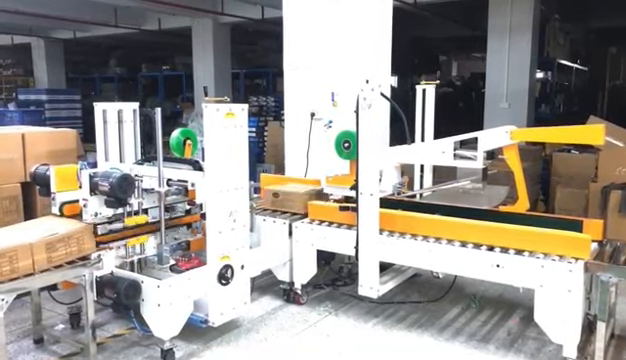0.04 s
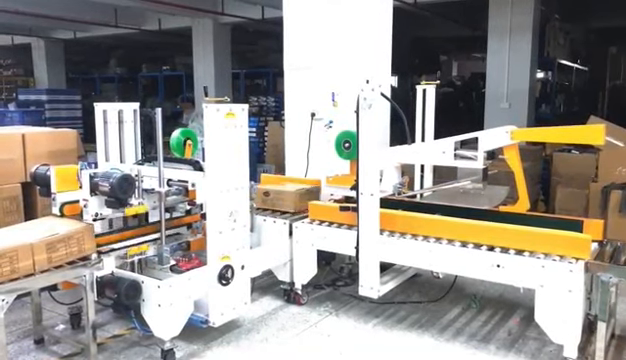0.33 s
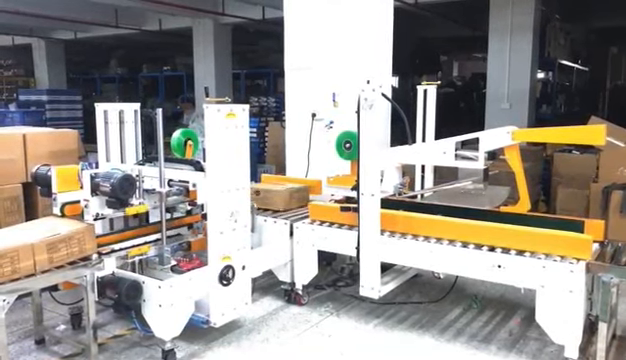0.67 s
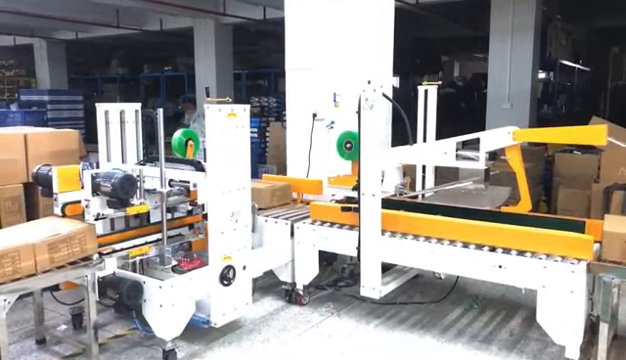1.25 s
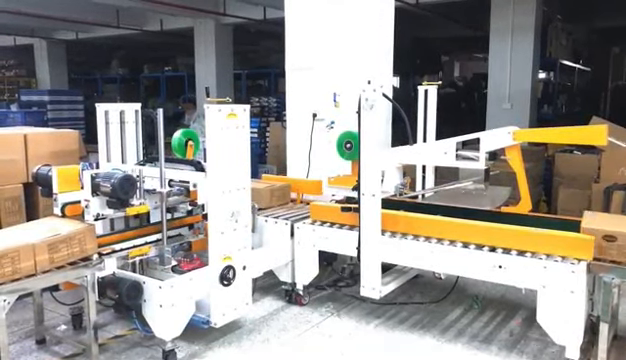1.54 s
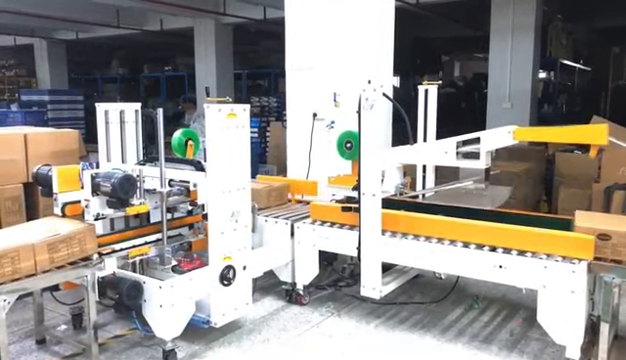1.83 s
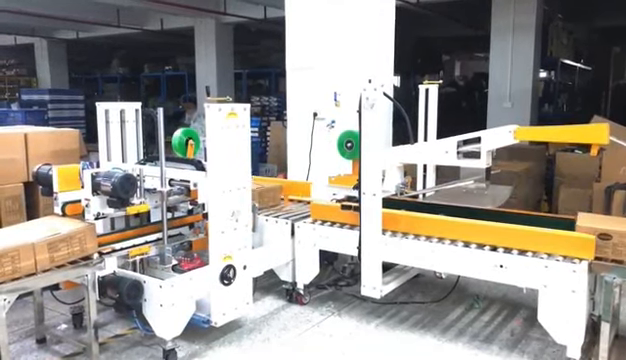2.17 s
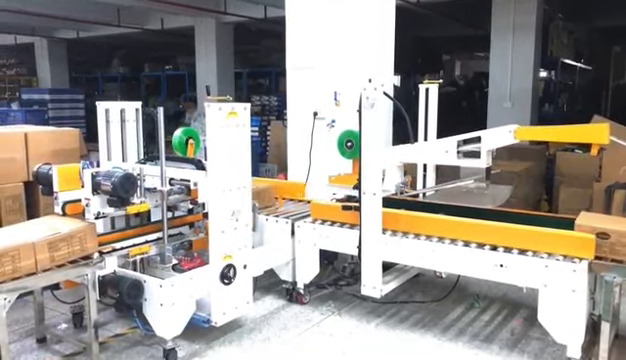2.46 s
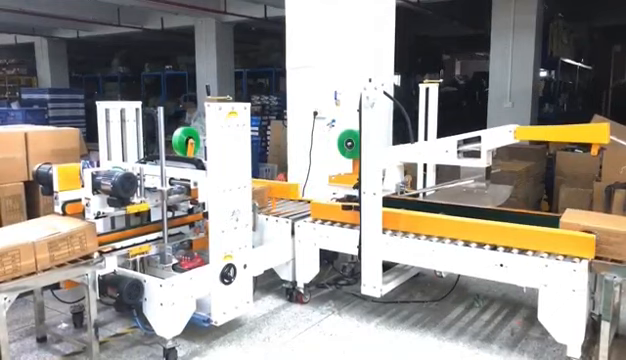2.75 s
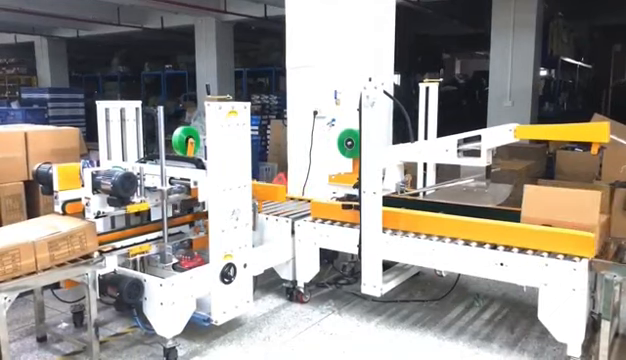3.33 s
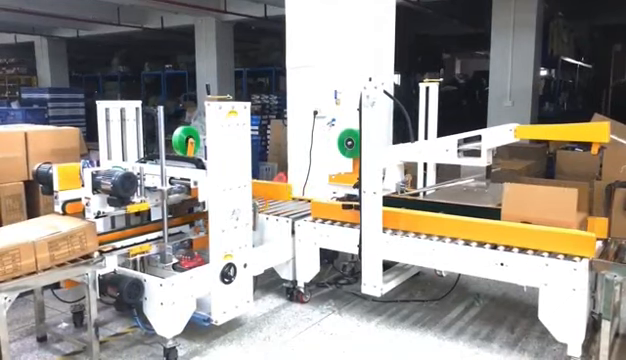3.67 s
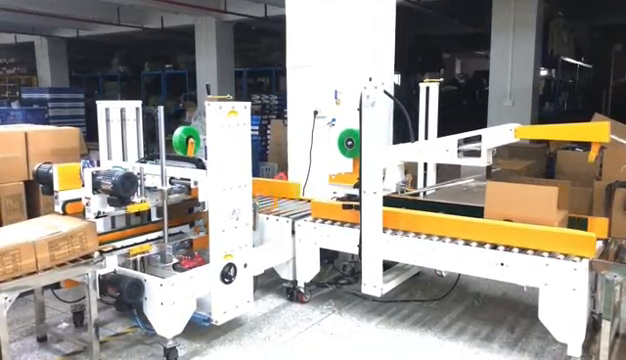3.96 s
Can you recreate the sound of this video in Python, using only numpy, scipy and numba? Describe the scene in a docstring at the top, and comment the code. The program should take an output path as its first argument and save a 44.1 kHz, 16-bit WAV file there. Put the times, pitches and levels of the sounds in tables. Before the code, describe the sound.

Packing tape squawks in a carton sealing machine at about 0.3 and 1.1 seconds, each time with a puff of air; the second leaves a slowly fading hiss. Cardboard scrapes around 1.5 seconds, and a metal arm rattles and clanks at 1.8. From 3 to 4 seconds tape peels in a long rasp with brief squeals. Throughout, cartons bump along a softly rumbling conveyor in an echoing warehouse.

```python
"""A carton sealing line in a warehouse; cartons bump along a rumbling conveyor throughout.
Air cylinders vent and linkages clack. At 0.3 s and 1.1 s packing tape squawks off its roll as stick-slip
rings the film; a slow air bleed starts with the second pull. A folding arm scrapes a flap, swings up and
strikes its stop at 1.8 s. From 3 s a long pull rasps through a carton, which squeals where it catches."""
import sys
import numpy as np
from scipy import signal
from scipy.fft import rfft, irfft
from scipy.io import wavfile
from scipy.ndimage import uniform_filter1d
from numba import njit

SR = 44100
rng = np.random.default_rng(int(sys.argv[2]) if len(sys.argv) > 2 else 0)


def wav_record(signal):
    """Record a signal, one row per channel, as 16-bit PCM in the file named by sys.argv[1]."""
    frames = np.transpose(np.atleast_2d(signal))
    bounded = np.clip(frames, -1, 1)
    # unit amplitude maps onto the largest positive 16-bit level
    quanta = np.round(bounded * 32767).astype(np.int16)
    wavfile.write(sys.argv[1], SR, quanta)


N = 176400

SLIP_JITTER, SLIP_SCATTER_DB = 0.4, 2  # stick-slip of the tape
# cardboard friction spectrum (frequency [Hz], relative density [dB])
CARDBOARD = [(80, -14), (260, -7), (480, -4), (760, -0.5), (1080, -4.5), (2300, -3.5), (3400, -7),
             (13000, -24)]


def short_pulls(t):
    """Stick-slip jerks ring the stretched film, finer snaps crackle, and the spinning roll drones."""
    # one table per pull (time [s], film ring [Hz], relative ring level [dB], relative crackle level [dB])
    pulls = [
        [(0.281, 2060, -20.5, -28), (0.348, 2270, -7.5, -23.5), (0.362, 2520, -18, -24),
         (0.386, 2630, -16, -22), (0.431, 2230, -21, -21), (0.48, 2280, -10, -21.5), (0.518, 2300, -19, -23.5),
         (0.538, 2240, -9.5, -27.5), (0.578, 2290, -23, -30), (0.6, 2210, -16, -38), (0.625, 2210, -42, -44)],
        [(1.14, 2480, -29, -16), (1.16, 2400, -10.5, -26), (1.21, 2260, -6.5, -19.5), (1.282, 2260, -7, -20),
         (1.474, 2620, -18.5, -16.5), (1.538, 2110, -14.5, -19), (1.59, 2440, -40, -36)],
    ]
    # glue crackle spectrum (frequency [Hz], relative density [dB])
    crackle_spectrum = [(100, -7.5), (700, -5), (1700, -0.5), (2800, 4.5), (4200, 1.5), (7500, -5.5),
                        (11800, -9), (14000, -19)]
    # roll drones (start [s], length [s], level [dB], pitch [Hz], glide [Hz/s])
    drones = [(0.276, 0.08, -36.5, 175, -2), (0.382, .18, -28.5, 198.2, 85),
              (1.127, 0.092, -30.5, 195.2, 163)]
    ring_gain_db, ring_width_hz, crackle_gain_db = -10.5, 550, 1
    whistle_db, whistle_width_hz = -7.5, 100  # narrow core, level relative to the ring
    out = 0
    for pull in pulls:
        times, hz, ring_db, crackle_db = np.array(pull, float).T
        gate = envelope(t, times[0], times[-1] - times[0], attack_s=0.0065, release_s=0.022)
        slips = snaps(420, SLIP_JITTER, SLIP_SCATTER_DB)
        fine = unit(snaps(rate_hz=3200, jitter=1.0, scatter_db=2) + 0.5 * slips)
        centre_hz = np.interp(t, times, hz) * (1 + 0.036 * walk(60.55))
        ring = unit(resonate_twice(slips + 0.69 * fine, centre_hz, ring_width_hz))
        ring += undb(whistle_db) * unit(resonate_twice(noise(), centre_hz, whistle_width_hz))
        ring *= undb(ring_gain_db + np.interp(t, times, ring_db))
        crackle = colour(fine, crackle_spectrum) * undb(crackle_gain_db + np.interp(t, times, crackle_db))
        out += gate * (ring + crackle)
    return out + groans(t, drones, waver=0.059, attack_s=0.017, release_s=0.017)


def long_pull(t):
    """Tape peels at belt speed; its dense snaps sound through the carton, which squeals as it catches."""
    # peel spectrum (frequency [Hz], relative density [dB])
    peel_spectrum = [(60, -33), (130, -11), (520, -10.5), (900, -4), (1170, -5), (2200, -1.5), (3350, -4),
                     (4450, -5), (7300, -9.5), (11500, -10.5), (13900, -25)]
    # taped carton resonances (frequency [Hz], width [Hz], gain on the peel [dB])
    carton_modes = [(736, 93, -2), (878, 28, 1.5), (1580, 94, -6.5), (2190, 110, -8), (2900, 160, -7)]
    # tape grabs and rasps harder (start [s], length [s], level [dB], film ring [Hz])
    surges = [(3.628, 0.066, -22.5, 2430), (3.836, 0.049, -21, 2500)]
    # carton squeals (start [s], length [s], level [dB], pitch [Hz], glide [Hz/s])
    squeals = [(3.624, 0.068, -24.5, 893, -700), (3.73, .04, -30, 970, 300), (3.968, .05, -16.5, 702, 1500)]
    start_s, attack_s, rasp_db = 2.978, 0.05, -15.5
    glue = snaps(rate_hz=4200, jitter=0.96, scatter_db=0.5)
    peel = colour(glue * undb(1.35 * walk(70) + 0.5 * walk(12)), peel_spectrum)
    carton = 0
    for hz, width_hz, db in carton_modes:
        gain = undb(db + 4.8 * walk(7.6))
        centre_hz = hz * (1 + 0.044 * walk(9))  # shifts as the carton moves
        carton += gain * resonate(peel, centre_hz, width_hz)
    rasp = unit(peel + carton) * undb(rasp_db) * np.clip((t - start_s) / attack_s, 0, 1) ** 2
    for grab_s, length_s, db, hz in surges:
        jerks = unit(resonate_twice(snaps(260, SLIP_JITTER, SLIP_SCATTER_DB), hz, width_hz=1150))
        rasp += undb(db) * jerks * envelope(t, grab_s, length_s, attack_s=0.008, release_s=0.01)
    return rasp + groans(t, squeals, waver=0.049, attack_s=0.012, release_s=0.01)


def groans(t, rows, waver, attack_s, release_s):
    """Short friction tones that glide and waver in pitch and strength."""
    flicker_db = 3
    out = 0
    for start_s, length_s, db, hz, glide_hz_per_s in rows:
        pitch_hz = (hz + glide_hz_per_s * np.clip(t - start_s, 0, length_s)) * (1 + waver * walk(150))
        shape = envelope(t, start_s, length_s, attack_s, release_s)
        tone = shape * np.sin(2 * np.pi * np.cumsum(pitch_hz) / SR) * undb(flicker_db * walk(110))
        out += undb(db) * tone * np.sqrt(np.sum(shape ** 2) / (np.sum(tone ** 2) + 1e-18))
    return out


def air_vents(t):
    """Each cylinder valve opens at once and hisses more weakly as the pressure falls."""
    # air bursts (start [s], length [s], level [dB], fall [dB/s], attack [s])
    vents = [(-.05, 0.12, -24, 19, .01), (0.27, 0.065, -30, 18, .008), (0.759, 0.045, -40.5, 4, .025),
             (1.093, .01, -30, 0, 0.0045), (1.104, 0.015, -17.5, 300, 0.0028),
             (1.817, 0.02, -21.5, 56, .01), (2.872, 0.03, -29.5, 20, .012)]
    # hiss spectrum (frequency [Hz], relative density [dB])
    spectrum = [(300, -1), (1400, -7.5), (2600, -1), (5800, 2.5), (8200, 0.5), (11600, 1.5), (13800, -17)]
    power = 0
    for start_s, length_s, db, fall_db_per_s, attack_s in vents:
        gain = undb(db - fall_db_per_s * np.clip(t - start_s, 0, length_s))
        power += (gain * envelope(t, start_s, length_s, attack_s, release_s=0.023)) ** 2
    return colour(noise(), spectrum) * np.sqrt(power)


def air_bleed(t):
    """One cylinder empties slowly through a throttle."""
    # throttle hiss spectrum (frequency [Hz], relative density [dB])
    spectrum = [(1200, -9.5), (2100, -0.5), (2800, 0.5), (3400, -4), (6300, 1.5), (8300, -5), (11600, -2.5),
                (13400, -26)]
    start_s, attack_s, level_db, fall_db_per_s = 1.09, 0.054, -27, 4
    gain = undb(level_db - fall_db_per_s * (t - start_s)) * np.clip((t - start_s) / attack_s, 0, 1)
    return colour(noise(), spectrum) * gain


def flap_rub(t):
    """Cardboard drags along the guides and under the folding arm in fine, uneven catches."""
    # rubbing strength (time [s], level [dB])
    levels = [(0.33, -51), (0.46, -33), (0.68, -62), (0.80, -38), (1.05, -56), (1.29, -31), (1.39, -47),
              (1.50, -20.5), (1.58, -44), (1.72, -38), (1.82, -23.5), (1.93, -30.5), (2.22, -32.5),
              (2.29, -42.5), (2.5, -39.5), (2.58, -36), (2.75, -42.5), (3.05, -35.5)]
    times, db = np.array(levels).T
    rub = colour(snaps(rate_hz=2500, jitter=0.99, scatter_db=1.0), CARDBOARD)
    gate = envelope(t, times[0], times[-1] - times[0], attack_s=0.0082, release_s=0.043)
    return rub * undb(np.interp(t, times, db) + 1.7 * walk(39.6)) * gate


def folding_arm(t):
    """The arm rattles harder as it swings up, then strikes its stop; both ring its steel frame."""
    # blows on the stop (time [s], drive level [dB])
    stops = [(1.811, -29), (1.832, -23)]
    # frame resonances (frequency [Hz], gain [dB])
    modes = [(732, 1), (1150, -2), (1440, 0), (2270, -8), (2720, -9)]
    swing_drive_db, width_hz = -29.5, 87
    swing = undb(swing_drive_db) * envelope(t, 1.73, length_s=0.07, attack_s=0.07, release_s=0.051)
    blows = sum(undb(db) * envelope(t, at_s, 0, attack_s=0.001, release_s=0.011) for at_s, db in stops)
    drive = swing * snaps(rate_hz=900, jitter=0.8, scatter_db=0) + blows * noise()
    ring = sum(undb(db) * resonate_twice(drive, hz, width_hz) for hz, db in modes)
    return ring * np.sqrt(SR / (np.pi * width_hz))  # make-up gain for the narrow bands


def carton_bumps(t):
    """Cartons bump on the rollers: hollow modes with a little cardboard grit."""
    # bumps (time [s], level [dB], pitch [Hz])
    bumps = [(0.116, -34.5, 327), (0.776, -25, 156.7), (0.984, -30.5, 156), (1.022, -29, 97),
             (1.133, -30, 161), (1.471, -28, 292), (1.622, -25.5, 157), (1.827, -28.5, 134),
             (2.552, -21.5, 160), (2.61, -30, 150), (3.265, -23.5, 197), (3.357, -17.5, 268),
             (3.415, -22, 202), (3.974, -23, 296)]
    # carton modes (frequency [x pitch], gain [dB])
    modes = [(.68, -9), (1.002, 1.5), (1.32, -6.5), (2.1, -10.5)]
    grit = undb(-25) * colour(noise(), CARDBOARD)
    out = 0
    for at_s, level_db, hz in bumps:
        body = sum(undb(db) * np.sin(2 * np.pi * hz * ratio * (t - at_s)) for ratio, db in modes)
        shape = envelope(t, at_s, length_s=0.0055, attack_s=0.0055, release_s=0.022)
        out += undb(level_db) * shape * (body + grit)
    return out


def linkage_clacks(t):
    """Metal linkages knock in short, bright bursts."""
    # clacks (time [s], level [dB])
    clacks = [(.117, -30), (0.213, -30.5), (1.871, -23.5), (2.109, -29)]
    # linkage spectrum (frequency [Hz], relative density [dB])
    spectrum = [(200, -16), (1900, 3.5), (2300, 12), (2800, -0.5), (6000, 1), (13000, -16)]
    blows = sum(undb(db) * envelope(t, at_s, 0, attack_s=0.00083, release_s=0.048) for at_s, db in clacks)
    return colour(noise() * blows, spectrum)


def conveyor(t):
    """Rollers rumble more under load and waver, over the steady whirr of the motors."""
    # roller spectrum (frequency [Hz], relative density [dB])
    roller_spectrum = [(20, -19.5), (55, -4.5), (200, -5.5), (2000, -58)]
    # rumble strength (time [s], level [dB])
    levels = [(1.07, -44.5), (1.12, -37.5), (2.2, -43.5), (3.4, -39)]
    # motor spectrum (frequency [Hz], relative density [dB])
    motor_spectrum = [(350, -10), (520, -17), (2200, -19.5), (12000, -37)]
    waver_db, motor_db = 4, -41.5
    times, db = np.array(levels).T
    rumble = colour(noise(), roller_spectrum) * undb(np.interp(t, times, db) + waver_db * walk(17))
    return rumble + colour(noise(), motor_spectrum) * undb(motor_db)


def hall(x, t):
    """Warehouse reverberation; two echo patterns slowly crossfade, keeping the tail smooth and even."""
    crossfade_hz = 0.805
    first, second = room_response(t), room_response(t)
    phase = 2 * np.pi * crossfade_hz * t
    wet = signal.fftconvolve(x * np.cos(phase), first) + signal.fftconvolve(x * np.sin(phase), second)
    return (x + wet[:N]) / np.sqrt(1 + np.sum(first ** 2))


def room_response(t):
    """Close echoes off floor and frames, then a diffuse tail whose treble lasts slightly longer."""
    split_hz, low_t60_s, high_t60_s, build_s = 3000, 0.6, 0.67, 0.029
    tail_db, near_db = -5.5, -9.5
    low = signal.sosfilt(signal.butter(2, split_hz, fs=SR, output="sos"), noise())
    high = signal.sosfilt(signal.butter(2, split_hz, "high", fs=SR, output="sos"), noise())
    tail = (low * undb(-60 * t / low_t60_s) + high * undb(-60 * t / high_t60_s)) * np.clip(t / build_s, 0, 1)
    burst = noise() * envelope(t, 0.0018, 0, attack_s=0.0013, release_s=0.0088)
    near = colour(burst, [(400, -8), (1500, -10.5)])
    echoes = undb(tail_db) * unit(tail) + undb(near_db) * unit(near)
    return colour(echoes, [(150, -4.5), (600, 0.5)]) / np.sqrt(N)


def snaps(rate_hz, jitter, scatter_db):
    """Stick-slip clicks of uneven spacing and size, rms 1."""
    gap, size = rng.standard_normal((N // 4, 2)).T
    at = (np.cumsum(np.exp(jitter * gap - jitter ** 2 / 2)) * SR / rate_hz).astype(int)
    x = np.bincount(at[at < N], undb(scatter_db * size[at < N]), N)
    return unit(x - x.mean())


def envelope(t, start_s, length_s, attack_s, release_s):
    """Linear attack, hold, exponential release."""
    attack = np.clip((t - start_s) / attack_s, 0, 1)
    return attack * np.exp(-np.maximum(t - start_s - length_s, 0) / release_s)


@njit
def svf(x, hz, width_hz):
    """State-variable band-pass with a moving centre."""
    y, band_state, low_state = np.empty(len(x)), 0., 0.
    for i in range(len(x)):
        g, damping = np.tan(np.pi * hz[i] / SR), width_hz / hz[i]
        band = (band_state + g * (x[i] + 1e-18 - low_state)) / (1 + g * (g + damping))
        band_state, low_state = 2 * band - band_state, low_state + 2 * g * band
        y[i] = damping * band
    return y


def resonate(x, hz, width_hz):
    """One resonance, gain 1 at its centre."""
    return svf(x, hz * np.ones(N), float(width_hz))


def resonate_twice(x, hz, width_hz):
    """Resonance with steeper skirts: a second stage, twice as wide."""
    return resonate(resonate(x, hz, width_hz), hz, 2 * width_hz)


def colour(x, points):
    """Minimum-phase filter through (frequency [Hz], level [dB]) points; keeps white noise power."""
    hz, db = np.array(points, float).T
    size = 4096
    gain = undb(np.interp(np.log(np.fft.rfftfreq(size, 1 / SR) + 1), np.log(hz), db))
    cepstrum = irfft(np.log(unit(gain)))
    cepstrum[1:size // 2] *= 2
    cepstrum[size // 2 + 1:] = 0
    return signal.fftconvolve(x, irfft(np.exp(rfft(cepstrum))))[:N]


def walk(rate_hz):
    """Smooth random wander about zero."""
    step = int(SR / rate_hz)
    return 0.789 * uniform_filter1d(np.repeat(rng.standard_normal(N // step + 1), step), step)[:N]


def noise():
    """White noise."""
    return rng.standard_normal(N)


def unit(x):
    """Scale to rms 1."""
    return x / np.sqrt(np.mean(x ** 2) + 1e-18)


def undb(db):
    """Decibels to gain."""
    return 10 ** (np.asarray(db) / 20)


def scene():
    """Tape, air and mechanics in the hall, over the conveyor; mono."""
    t = np.arange(N) / SR
    tape = short_pulls(t) + long_pull(t)
    air = air_vents(t) + air_bleed(t)
    mechanics = flap_rub(t) + folding_arm(t) + carton_bumps(t) + linkage_clacks(t)
    return (hall(tape + air + mechanics, t) + conveyor(t))[None]


def record(dry):
    """The recorder eases its gain down in loud moments, rounds the highest peaks and cuts the top."""
    threshold_db, window_s, slope, top_hz = -10.5, 0.012, 0.41, 13400
    pole = np.exp(-1 / (window_s * SR))
    rms = np.sqrt(signal.lfilter([1 - pole], [1, -pole], dry ** 2) + 1e-18)
    compressed = dry * np.minimum(undb(threshold_db) / rms, 1) ** slope
    rounded = np.tanh(1.07 * compressed) / 1.03
    return signal.sosfilt(signal.ellip(8, 0.2, 70, top_hz, fs=SR, output="sos"), rounded)


dry = scene()
out = record(dry)
wav_record(out)
```